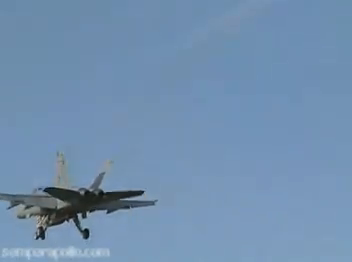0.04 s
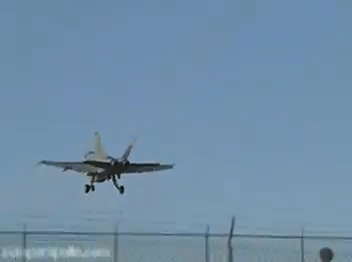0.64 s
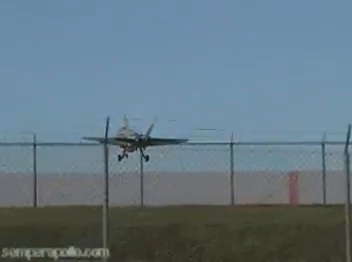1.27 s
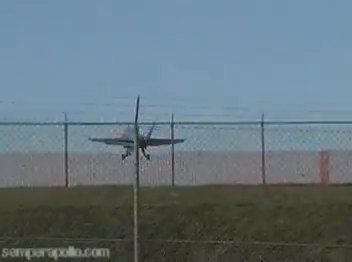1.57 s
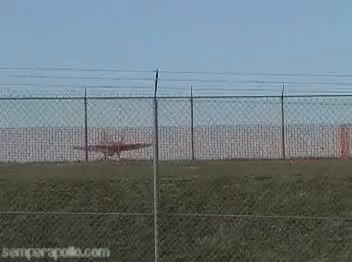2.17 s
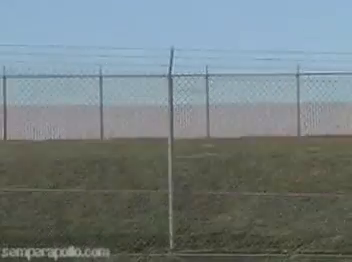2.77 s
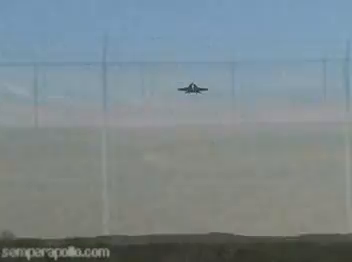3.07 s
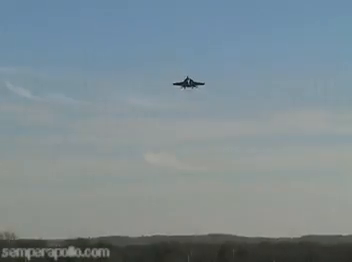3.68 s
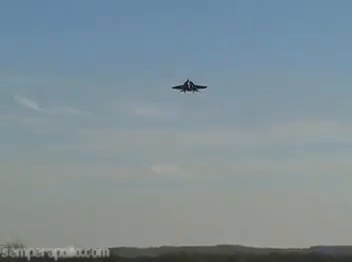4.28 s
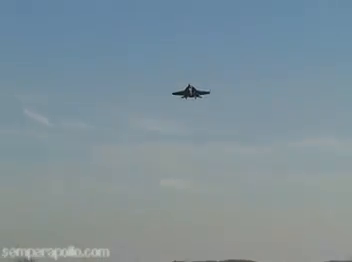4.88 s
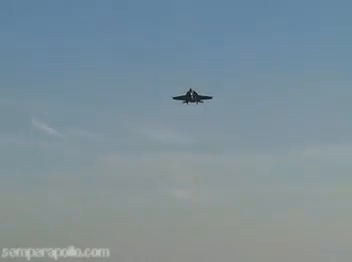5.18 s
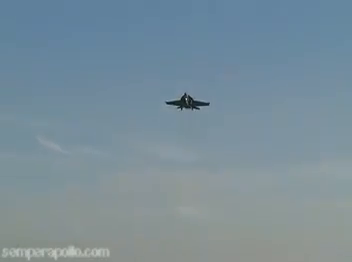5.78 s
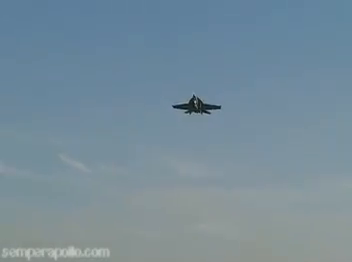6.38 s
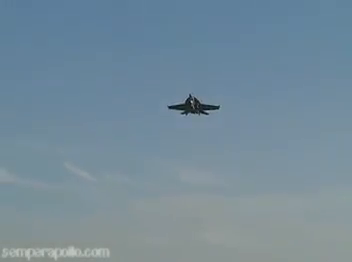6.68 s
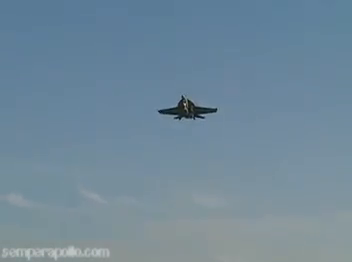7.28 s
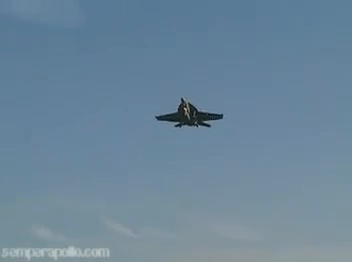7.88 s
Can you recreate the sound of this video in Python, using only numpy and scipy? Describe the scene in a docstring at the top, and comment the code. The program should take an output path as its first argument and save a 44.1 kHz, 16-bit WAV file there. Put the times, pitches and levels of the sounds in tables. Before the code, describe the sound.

A jet fighter roars away at close range, heard outdoors from an airfield fence. Its deep, tearing exhaust is so loud that the microphone briefly crackles, then it surges with dull thumps and fades. The sound blends into a much quieter second jet, far off and approaching. That roar grows steadily, with gliding howls, faint whistles, a slowly sweeping whoosh and a thin high whine near the end.

```python
"""A jet fighter roars away to land; its sound fades into that of a second one, far off and closing in.
Both are heard from the airfield fence. The roar is hot exhaust mixing with the air. It swells and
howls, and its echo off the ground adds a slowly sweeping whoosh. The first jet is so close that
the microphone crackles; the second whines and whistles with its spinning blades."""
import sys
import numpy as np
from scipy import signal
from scipy.io import wavfile
from scipy.ndimage import uniform_filter1d

SR = 44100
rng = np.random.default_rng(int(sys.argv[2]) if len(sys.argv) > 2 else 0)


def bounce(signal):
    """Save signal as a 16-bit WAV file at the path given by the first command-line argument."""
    frames = np.transpose(np.atleast_2d(signal))
    limited = np.clip(frames, -1, 1)
    pcm = np.round(limited * 32767).astype(np.int16)
    wavfile.write(sys.argv[1], SR, pcm)


N = 350154
TIME = np.arange(N) / SR
FRAME, HOP = 2048, 512   # noise is shaped in short overlapping frames; sizes in samples
BINS = np.maximum(np.fft.rfftfreq(FRAME, 1 / SR), 1)   # the frequencies in a frame, Hz
STEPS = np.arange(N // HOP + 2) * HOP / SR   # the time of each frame, s
FAR_S, OVERHEAD_S = 3.25, 11.5   # when the second jet is far off, and when it would be overhead
CUTOFF_HZ = 14400
# the four zones of exhaust noise (rumble, roar, rush, hiss): low f/Hz, high f/Hz
ZONES = [(40, 200), (250, 1300), (1500, 4000), (4500, 7500)]


def departing_jet(behind_bank_s=(1.75, 2.65)):
    """Heard from behind: it fades, the hiss fastest, surges in gusts and sinks behind a grass bank."""
    # tone colour of the exhaust from behind: f/Hz, relative level/dB
    spectrum = [(20, -16.5), (45, -2.5), (110, 1.5), (260, 3), (560, 0.7), (950, -7.5), (1500, -18),
                (2000, -18), (2400, -22.5), (3000, -21), (3450, -26), (3950, -36.5), (4350, -40),
                (4750, -53.5), (5500, -51), (6600, -48), (8300, -70.5), (12200, -76.5)]
    # one row per zone: starting level/dB, fading/(dB per s), loss behind the bank/dB
    receding = [(-19, 1.3, 6.5), (-14, 1.5, 4.5), (-33.5, 0.84, 5.5), (-50, 6.5, 4.5)]
    # rush and hiss surge together: t/s, half length/s, boost/dB
    surges = [(0.274, 0.082, 6.5), (0.58, 0.096, 6.5), (0.77, 0.059, 5), (1.052, 0.076, 4.5),
              (1.268, 0.18, 4.5), (2.079, 0.24, 3.5), (2.78, 0.15, 5)]
    # echo off the ground: t/s, lag/ms, strength (0-1)
    reflection = [(0, 1.92, .65), (.22, 1.72, .55), (.5, 1.61, .3), (1, 1.56, .3), (1.2, 1.6, .12),
                  (1.6, 1.66, .18), (2.6, 1.85, .05)]
    hidden = np.interp(STEPS, behind_bank_s, [0, 1])
    rumble, roar, rush, hiss = [db - loss * STEPS - shadow * hidden for db, loss, shadow in receding]
    surge = sum(db * bell(STEPS, s, length) for s, length, db in surges)
    levels = [rumble, roar, rush + surge, hiss + surge]
    change_db = swells_and_dips(flicker_db=0.5)
    ground = ground_echo(*in_time(reflection, STEPS))
    return exhaust(levels, spectrum, change_db, ground, absorb_db_per_khz=17.5, churn_db=1.0, churn_hz=14)


def approaching_jet(far_rumble_db=-48, db_per_halving=9.5, steady_lag_ms=1.3, climb_lag_ms=.71):
    """Heard from ahead: it grows louder and brighter, and its whoosh slides down as it stands higher."""
    # tone colour of the exhaust from ahead: f/Hz, relative level/dB
    spectrum = [(20.0, -7), (50.0, -10), (115.0, 1.5), (200.0, -1.5), (380.0, -2), (600.0, -6), (950.0, -6),
                (1500.0, -11), (2000.0, -14), (2350, -20.5), (2650, -19.5), (3000, -25.5), (3400, -29),
                (3900, -40), (4700, -51)]
    # growing loudness: t/s, roar level/dB, rush level/dB
    nearing = [(3.2, -45.5, -58), (4.28, -45, -53.5), (5.48, -37, -48.5), (7.0, -33, -43),
               (7.9, -30.5, -42)]
    distance = np.maximum((OVERHEAD_S - STEPS) / (OVERHEAD_S - FAR_S), 0.1)   # 1 when far off
    rumble = far_rumble_db - db_per_halving * np.log2(distance)
    levels = [rumble, *in_time(nearing, STEPS)]
    change_db = swells_and_dips(flicker_db=1.2) + thinning_air()
    echo_strength = .48 * bell(STEPS, centre=6.2, half_width=1.3)
    ground = ground_echo(steady_lag_ms + climb_lag_ms / distance, echo_strength, grass_hz=3400)
    return exhaust(levels, spectrum, change_db, ground, absorb_db_per_khz=8, churn_db=.25, churn_hz=39)


def exhaust(levels, spectrum, change_db, ground, absorb_db_per_khz, churn_db, churn_hz):
    """Stereo noise of hot gas swirling into the air, after its way through the air and over the ground."""
    # faint noise that differs between left and right, widening the treble:
    # f/Hz, level/dB against the direct sound
    width = [(30, -17.5), (500, -41.5), (1500, -19.5), (3000, -18), (5000, -5), (8000, -15.5)]
    beyond_khz = np.maximum(BINS - spectrum[-1][0], 0)[:, None] / 1000
    gain = from_db(at_bins(spectrum) - absorb_db_per_khz * beyond_khz)   # the air swallows the top
    # each zone follows its own level; the frequencies between zones blend
    zones = ZONES[:len(levels)]
    powers = [np.sum(gain[(BINS > low) & (BINS < high)] ** 2) for low, high in zones]
    lifts_db = [level - 10 * np.log10(power) for level, power in zip(levels, powers)]
    edges = np.log(zones).ravel()
    blend = np.transpose([np.interp(np.log(BINS), edges, row.repeat(2)) for row in np.eye(len(zones))])
    gain = gain * from_db(blend @ lifts_db + change_db) * ground
    direct = shaped_noise(gain)
    side = shaped_noise(gain * from_db(at_bins(width)))
    # big swirls shake everything above the rumble together, which makes the noise tear
    upper = filtered(direct, 1, 500, "high")
    churn = from_db(churn_db * uniform_filter1d(drift(churn_hz, TIME)[0], size=40))
    return direct + upper * (churn / rms(churn) - 1) + side * [[1], [-1]]


def swells_and_dips(flicker_db, flicker_hz=12.0, bands=16):
    """Gliding swells and dips in single bands of the roar, and a flicker that grows with pitch; in dB."""
    # one band gets briefly louder or softer:
    # t/s, half length/s, f/Hz, glide/(octaves per s), half width/octaves, boost/dB
    swells = [(.02, 0.15, 305, -0.29, 0.19, 13.5), (.02, 0.1, 465, 0.89, 0.13, 9.5),
              (.17, 0.062, 370, 0.28, 0.3, 12.5), (.34, 0.074, 455, 0.63, 0.25, 6),
              (0.31, 0.42, 3500, -.2, .23, 3.5), (0.28, 0.7, 45.6, 0.22, 0.57, -8.5),
              (0.553, 0.055, 520, 0, 0.37, -8), (0.67, 0.16, 120, .72, 1, 6.5),
              (.78, 0.22, 630, -2.4, 0.86, 4), (1.164, 0.098, 980, -0.64, 0.69, 8),
              (1.35, .25, 293, -0.33, 0.24, -9), (1.396, 0.15, 590, -1.8, 0.6, 4.5),
              (1.804, 0.19, 535, -0.5, .17, 6), (2.12, 0.19, 680, 0.3, 0.26, 6.5),
              (2.1, 0.28, 270, -0.12, 0.44, -3), (2.373, 0.09, 780, 0.55, 1, 5.5),
              (2.1, .16, 1330, 0.3, 1, 8.5), (2.86, 0.77, 56.4, 0.12, 1, 9.5), (2.1, .3, 5500, 0, 0.32, 4),
              (2.86, 0.45, 920, -.2, 0.4, 4.5), (3.05, 0.22, 370, 0.34, 0.22, 2.5),
              (3.05, 0.14, 597, -0.58, 0.88, 6.5), (2.93, 0.2, 2050, 0, 0.35, 2.5),
              (3.33, 0.084, 960, 0.73, 0.4, 8), (3.33, 0.37, 700, 0.079, 0.21, 6.5),
              (3.63, 0.26, 1020, 0.11, 0.43, 4.5), (3.96, 0.19, 2500, 0.68, 0.96, 3),
              (4.1, .63, 206, -0.018, 0.2, -10), (4.2, .6, 52, 0, .6, 4.5),
              (4.73, 0.21, 320, -1.2, 0.46, 4.5), (5.21, 0.15, 1040, 0.2, 0.14, 8),
              (5.25, 0.075, 490, -0.11, 0.14, 8), (5.3, 0.1, 710, -0.16, 0.16, -10),
              (5.54, 0.16, 960, 0.97, 0.38, 11.5), (5.56, 0.053, 380, 0, .3, 2.5),
              (5.7, 0.2, 684, -0.086, 0.28, 12), (5.9, 0.19, 506, -0.33, 0.12, 10),
              (5.5, 0.21, 240, 0.49, 0.54, 6), (6, 0.19, 2850, 0.28, 0.7, 5), (6.1, .6, 62, 0, 0.55, -2),
              (6.0, 0.95, 295.6, -1.1, 0.46, 2), (6.8, 0.25, 590, 0.17, 0.1, -5),
              (6.66, 0.17, 1060, -0.16, 0.23, 9.5), (6.62, 0.091, 780, -.2, 0.24, 4.5),
              (6.98, 0.35, 700, -0.46, 0.29, 10.5), (7.02, 0.25, 1020, -0.58, 0.37, 5),
              (7.38, 0.086, 748, -.1, 0.055, 12), (7.39, 0.089, 840, 0.28, 0.28, 5.5),
              (7.05, 0.35, 1750, 0, 0.099, 4.5), (6.98, 0.78, 262, 0.04, 0.12, 9),
              (7.63, 0.43, 350, 0.21, 0.67, -6), (7.8, 0.45, 740, 0.28, 0.11, 6.5),
              (7.88, 0.5, 1040, 0.2, 0.22, 9), (7.7, .25, 3330, 0, .1, 2.5), (7.88, .3, 150, 0, .3, -5.5),
              (3.3, 0.32, 67, 0, .5, 3)]
    pitch = np.log2(BINS)
    centres = np.linspace(np.log2(ZONES[0][1]), np.log2(CUTOFF_HZ), bands)
    blend = np.transpose([np.interp(pitch, centres, row) for row in np.eye(bands)])
    treble_weight = (BINS / (BINS + 500))[:, None]
    db = flicker_db * blend @ drift(flicker_hz, STEPS, bands) * treble_weight
    for s, length, hz, glide, octaves, boost_db in swells:
        near = np.abs(STEPS - s) < 3 * length
        centre = np.log2(hz) + glide * (STEPS[near] - s)
        db[:, near] += boost_db * bell(STEPS[near], s, length) * bell(pitch[:, None], centre, octaves)
    return db


def ground_echo(lag_ms, strength, grass_hz=2000):
    """The ground returns a late, duller copy that lifts some pitches and weakens others; the gains."""
    hz = BINS[:, None]
    echo = strength / (1 + (hz / grass_hz) ** 2)
    return np.sqrt(1 + echo ** 2 + 2 * echo * np.cos(2 * np.pi * hz * lag_ms / 1000))


def thinning_air(db_per_khz_per_s=1.15, from_hz=2000, top_hz=5500):
    """Less air lies in the way as the jet closes in, so its treble grows; the change in dB."""
    khz = (np.clip(BINS, from_hz, top_hz) - from_hz)[:, None] / 1000
    midway_s = (FAR_S + STEPS[-1]) / 2
    return db_per_khz_per_s * khz * (STEPS - midway_s)


def thumps(band_hz=(240, 1100)):
    """Brief dull thumps in the roar."""
    # single thumps: t/s, peak level/dB
    peaks = [(.642, -8), (1.024, -11), (1.361, -9), (1.813, -8), (2.179, -9), (2.231, -5), (5.459, -23),
             (5.578, -18), (6.702, -19), (6.831, -19), (7.333, -15)]
    unit_peak = np.abs(steep_band(signal.unit_impulse(FRAME), band_hz)).max()
    return steep_band(clicks(peaks), band_hz) / unit_peak


def cracks(spit_ms=.5, band_hz=(2600, 12500), front_db=-1.5, spit_db=-11):
    """The sharpest sound waves of the close jet make the microphone snap and spit a little noise."""
    # bright snaps: t/s, relative level/dB
    snaps = [(.004, -30), (.02, -29), (.037, -32), (.069, -34), (.085, -29), (.113, -31), (.124, -23),
             (.133, -31), (.1367, -29), (.149, -33), (.1595, -30), (.1638, -25), (.165, -24), (.1835, -31),
             (.237, -33), (.268, -35), (.273, -35), (.297, -29), (.31, -30), (.354, -35), (.358, -37),
             (.433, -38), (.504, -36)]
    fronts = from_db(front_db) * clicks(snaps)
    window = bell(np.arange(-200, 201) / SR * 1000, 0, spit_ms)
    spit = from_db(spit_db) * signal.fftconvolve(fronts, window, "same") * rng.standard_normal((2, N))
    return filtered(fronts + spit, 2, band_hz, "band")


def fan_whistles():
    """Gusts carry in tones of the fan blades: they swell out of the far roar, glide and sink back."""
    # whistles: t/s, half length/s, f/Hz, glide/(Hz per s), half width/Hz, level/dB
    whistles = [(3.997, 0.11, 2280, 0, 65, -62), (4.88, .12, 2290, 0, 65, -59),
                (4.256, 0.43, 1943, 251.5, 48, -55), (4.541, 0.087, 2070, 302.5, 63, -56),
                (4.949, 0.13, 2730, 149, 50, -62), (5.05, 0.61, 1763, -100, 90, -54),
                (5.42, 0.22, 2710, 349, 34.6, -67), (6.225, .17, 2130, -9, 49.6, -54),
                (6.656, .2, 2627, 2, 69, -65)]
    return sum(from_db(db) * bell(TIME, s, length) * blade_tone(hz + glide * (TIME - s), width)
               for s, length, hz, glide, width, db in whistles)


def compressor_whine():
    """The fast blades in the air intakes of the approaching jet sing one high tone."""
    # course of the whine: t/s, f/Hz, level/dB
    whine = [(3.2, 5600, -110), (5.8, 5250, -92), (6.2, 5300, -85), (6.58, 5230, -88), (6.85, 5610, -77),
             (7.3, 5500, -78), (7.45, 5570, -75), (7.68, 5540, -75.5), (7.78, 5520, -71), (7.94, 5500, -78)]
    hz, db = in_time(whine, TIME)
    return from_db(db) * blade_tone(hz, half_width_hz=85)


def blade_tone(hz, half_width_hz):
    """The tone of spinning blades, smeared into a narrow band by swirling air; rms 1."""
    smear = filtered(rng.standard_normal((2, N)), 2, half_width_hz)
    phase = 2 * np.pi * np.cumsum(hz) / SR
    tone = smear[0] * np.sin(phase) + smear[1] * np.cos(phase)
    return tone / rms(tone)


def background(hiss_db=-70.5, crossfeed=0.079, tick_gain_db=18, tick_hz=3000):
    """Soft microphone hiss, a thin steady ringing, and faint dry ticks as one jet fades into the other."""
    # tone colour of the hiss: f/Hz, relative level/dB
    spectrum = [(20, 3.5), (1000, 9.5), (4000, 4.5), (7000, 1.5), (14000, -1.5)]
    # ringing tones: f/Hz, level/dB
    tones = [(4134, -87.5), (5512, -88.5), (6891, -90.5), (8269, -93), (9647, -94.5), (11025, -96),
             (12403, -96), (13781, -98)]
    # ticks: t/s, relative level/dB
    tick_list = [(2.788, -42), (2.8213, -44), (2.8547, -55), (2.888, -43), (2.9215, -42), (2.955, -44),
                 (2.9884, -54), (3.0883, -51), (3.155, -54), (3.1884, -56)]
    hiss = from_db(hiss_db) * np.array([steady_noise(spectrum), steady_noise(spectrum)])
    ringing = sum(np.sqrt(2) * from_db(db) * np.sin(2 * np.pi * hz * TIME) for hz, db in tones)
    ticks = from_db(tick_gain_db) * filtered(clicks(tick_list), 1, tick_hz)
    return hiss + crossfeed * hiss[::-1] + ringing + ticks


def shaped_noise(gain):
    """Noise whose strength follows a grid of gains: a row per frequency, a column per frame."""
    white = rng.standard_normal((len(STEPS) - 1) * HOP)
    frames = signal.stft(white, nperseg=FRAME, noverlap=FRAME - HOP)[2]
    return signal.istft(frames * gain, nperseg=FRAME, noverlap=FRAME - HOP)[1][:N] * np.sqrt(FRAME / 2)


def steady_noise(spectrum):
    """Unchanging noise with the given tone colour; rms 1."""
    noise = shaped_noise(from_db(at_bins(spectrum)))
    return noise / rms(noise)


def drift(rate_hz, times, count=1):
    """Rows of smooth random wandering at evenly spaced times; rms 1."""
    pole = np.exp(-2 * np.pi * rate_hz * times[1])
    white = rng.standard_normal((count, 2 * len(times)))
    slow = signal.lfilter([1], [1, -2 * pole, pole * pole], white)[:, len(times):]
    return slow / rms(slow)


def clicks(rows):
    """One single-sample click for each row of t/s, level/dB."""
    out = np.zeros(N)
    for s, db in rows:
        out[round(s * SR)] = from_db(db)
    return out + 1e-18


def filtered(x, order, hz, kind="low"):
    """Keep the lows, the highs or a band; a higher order cuts more steeply."""
    return signal.sosfilt(signal.butter(order, hz, kind, fs=SR, output="sos"), x)


def steep_band(x, band_hz):
    """Keep one band, filtering twice for steep edges."""
    return filtered(filtered(x, 2, band_hz, "band"), 2, band_hz, "band")


def at_bins(spectrum):
    """A table of f/Hz, level/dB read at every frequency in BINS, as a column."""
    hz, db = np.transpose(spectrum)
    return np.interp(np.log(BINS), np.log(hz), db)[:, None]


def in_time(rows, times):
    """One curve for each column after t/s, its points joined by straight lines."""
    s, *columns = np.transpose(rows)
    return np.array([np.interp(times, s, column) for column in columns])


def bell(x, centre, half_width):
    """A smooth hump of height 1."""
    return np.exp(-((x - centre) / half_width) ** 2)


def from_db(db):
    """Decibels to gain."""
    return 10 ** (np.asarray(db) / 20)


def rms(x):
    """Root mean square: the average strength of a signal."""
    return np.sqrt(np.mean(x ** 2) + 1e-24)


def scene(handover_s=(2.72, 3.19)):
    """The departing jet fades out as the approaching one fades in."""
    share = np.interp(TIME, handover_s, [0, 1])
    jets = (1 - share) * departing_jet() + share * approaching_jet()
    return jets + thumps() + compressor_whine() + fan_whistles() + background()


def record(dry, rasp_hz=(5500, 11000), rasp_db=-45, rasp_power=2.2, left_db=-1.58):
    """The microphone rounds off loud peaks, rasps and snaps; the left is weaker, the top treble is cut."""
    # where the microphone overloads: t/s, limit (1 = full scale)
    headroom = [(0, .58), (.2, .62), (.36, .8), (.52, 1.4)]
    limit, = in_time(headroom, TIME)
    dry = dry * np.minimum(TIME / .003, 1)   # soft start
    rounded = dry / (1 + (dry / limit) ** 6) ** (1 / 6)
    # every peak that nears the limit rasps
    rasp = from_db(rasp_db) * np.abs(rounded / limit) ** rasp_power * rng.standard_normal((2, N))
    rasp = filtered(rasp, 2, rasp_hz, "band")
    out = (rounded + rasp + cracks()) * from_db([[left_db], [0]])
    return signal.sosfilt(signal.ellip(10, .1, 80, CUTOFF_HZ, fs=SR, output="sos"), out)


dry = scene()
out = record(dry)
bounce(out)
```